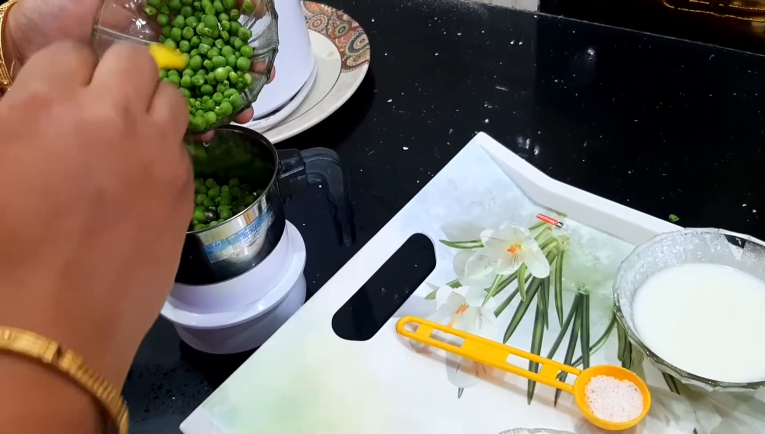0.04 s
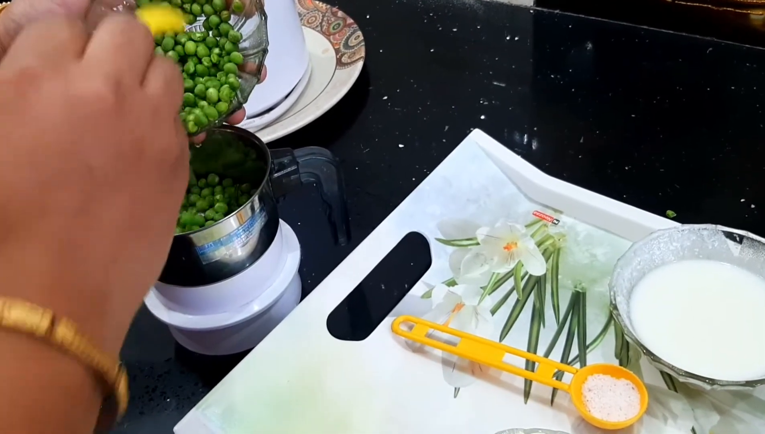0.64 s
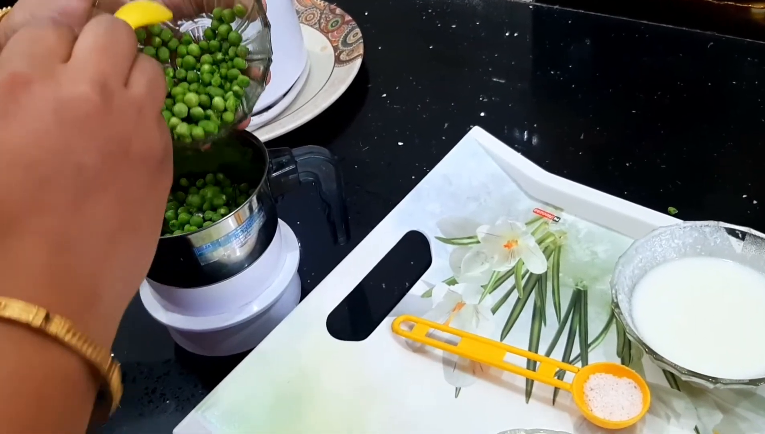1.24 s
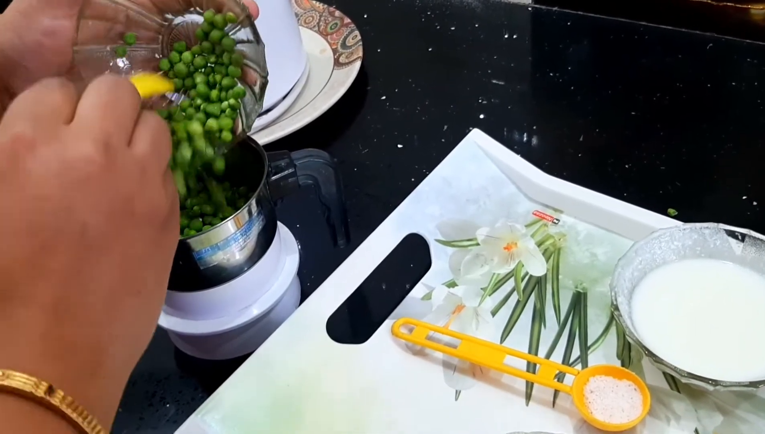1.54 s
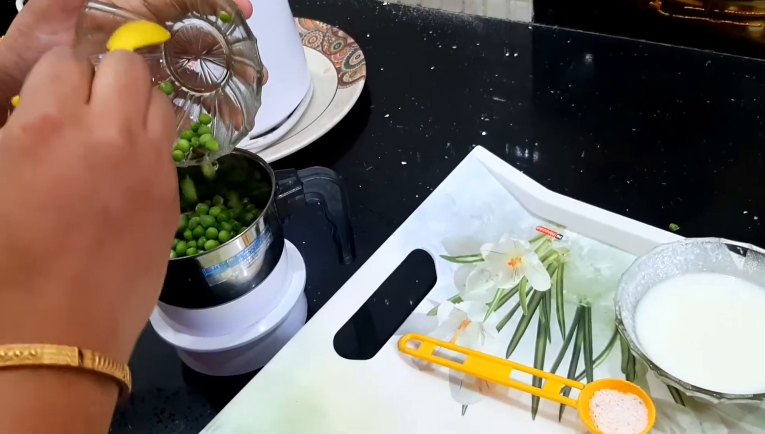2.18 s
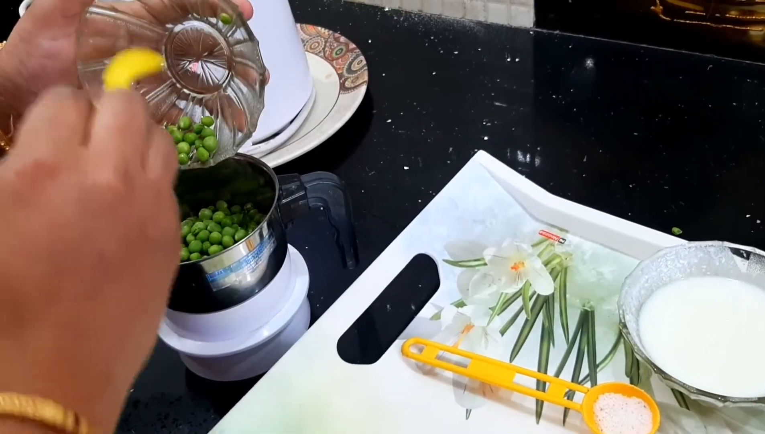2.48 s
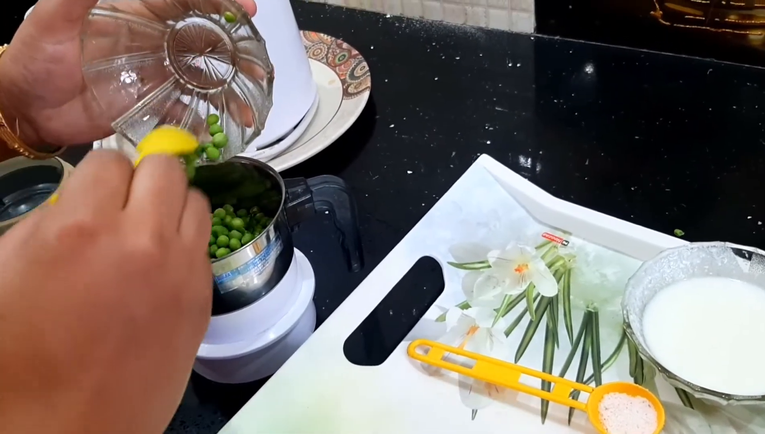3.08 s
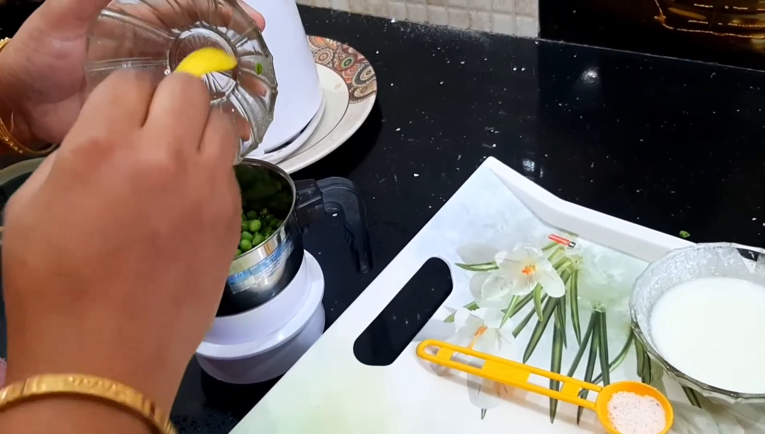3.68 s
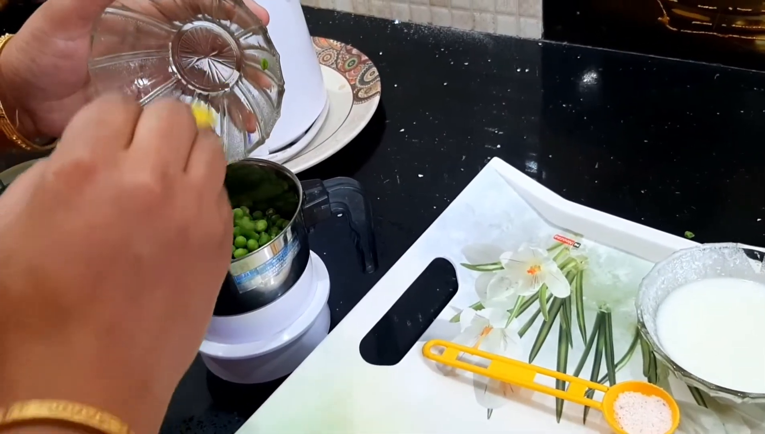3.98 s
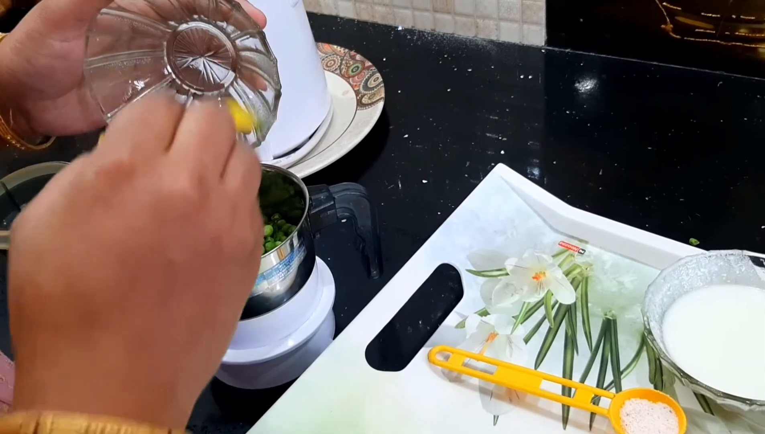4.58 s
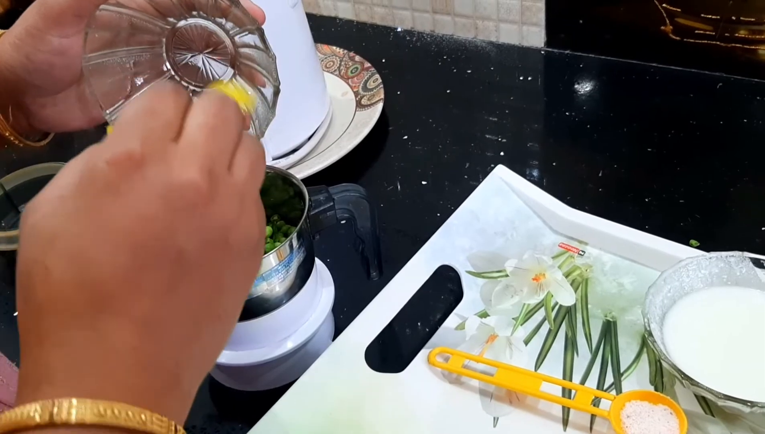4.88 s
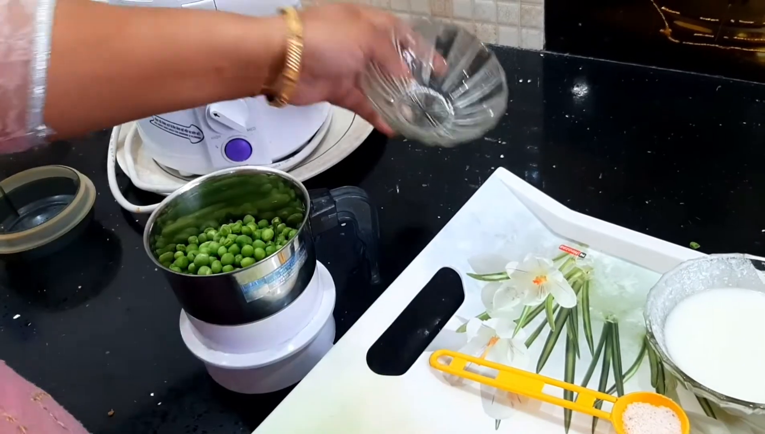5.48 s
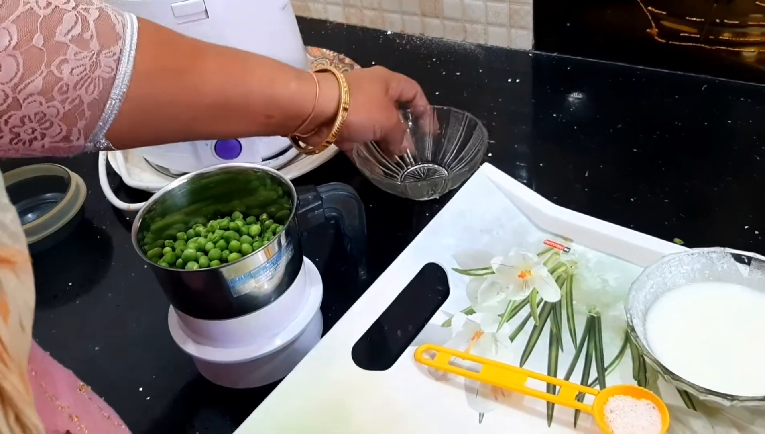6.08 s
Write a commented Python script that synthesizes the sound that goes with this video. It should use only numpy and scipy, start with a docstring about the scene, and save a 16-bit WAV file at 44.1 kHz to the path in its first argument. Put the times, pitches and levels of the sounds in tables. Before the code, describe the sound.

Peas plop softly into a steel jar amid faint spoon ticks, then an empty glass bowl rattles onto stone with a sharp clack.

```python
"""An empty glass bowl is set on a stone counter close to the microphones: it rattles on its foot and rings,
and something hard and light, likely the spoon, clacks down beside it. Before that, the plastic spoon
pushes green peas from the bowl into a steel grinder jar: faint rustles, dull plops and ticks.
A stereo pair hears it all in a tiled kitchen, over a low motor hum."""
import sys
import numpy as np
from scipy import signal
from scipy.fft import rfft, irfft, next_fast_len
from scipy.io import wavfile

SR = 44100
rng = np.random.default_rng(int(sys.argv[2]) if len(sys.argv) > 2 else 0)


def master_out(mix):
    """Clip the mix to full scale and print it as 16-bit PCM to the path in sys.argv[1]."""
    frames = np.transpose(np.atleast_2d(mix))
    ceiling = np.clip(frames, -1, 1)
    pcm = np.round(ceiling * 32767).astype(np.int16)
    wavfile.write(sys.argv[1], SR, pcm)


N = 279594


def undb(db):
    """Decibels to gain."""
    return 10 ** (np.asarray(db) / 20)


def unit(x):
    """Scale to rms 1."""
    return x / np.sqrt(np.mean(x ** 2))


def seconds(length):
    """Time axis of the given length."""
    return np.arange(int(length * SR)) / SR


def curve(rows):
    """Join (seconds, value) points into a value at every sample."""
    return np.interp(np.arange(N) / SR, *np.transpose(rows))


def lookup(points, hz):
    """Read (Hz, value) points on a log-frequency axis."""
    f, value = np.transpose(points)
    return np.interp(np.log(np.maximum(hz, 1)), np.log(f), value)


def walk(rate):
    """Random drift with a spread near 1, turning `rate` times a second."""
    steps = rng.standard_normal(1024)
    return np.interp(np.arange(N) / SR * rate, np.arange(len(steps)), steps)


def add(out, s, sound):
    """Mix a sound in at s seconds."""
    i = max(int(s * SR), 0)
    out[:, i:i + sound.shape[1]] += sound[:, :N - i]


def tilt_db(hz, tilt):
    """Hard contact lifts the treble, soft contact dulls it, by `tilt` dB per octave; the lows stay."""
    return tilt * np.log2(np.maximum(hz / 1650, 1))


def colour(x, points, tilt=0, size=4096):
    """Causal filter with the given (Hz, dB) spectrum, from the cepstrum of its log gain."""
    hz = np.linspace(0, SR / 2, size // 2 + 1)
    cepstrum = irfft(np.log(undb(lookup(points, hz) + tilt_db(hz, tilt))))
    cepstrum[1:size // 2] *= 2
    cepstrum[size // 2 + 1:] = 0
    impulse = irfft(np.exp(rfft(cepstrum)))
    return signal.fftconvolve(x, impulse[None], axes=1)[:, :x.shape[1]]


def stereo_noise(n, alike_hz=750):
    """White noise at two microphones: alike in the bass, unrelated in the treble."""
    size = next_fast_len(n)
    mid, side = rfft(rng.standard_normal((2, size)))
    alike = .88 / (1 + (np.linspace(0, SR / 2, len(mid)) / alike_hz) ** 4)
    mid, side = mid * np.sqrt(1 + alike), side * np.sqrt(1 - alike)
    return unit(irfft(np.array([mid + side, mid - side]), size)[:, :n])


def blows(rows, points, t60, rise_s):
    """Short contacts (seconds, dB, tilt) as noise bursts; softer things take longer to press home."""
    out, t = np.zeros((2, N)), seconds(.1)
    push = np.exp(-np.log(1000) * t / t60) * (1 - np.exp(-(t / rise_s) ** 2))
    for s, db, tilt in rows:
        blow = colour(stereo_noise(len(t)) * push, points, tilt)
        blow /= np.sqrt(np.sum(blow ** 2) / (2 * .004 * SR))  # the energy of 4 ms at rms 1
        add(out, s, undb(db) * blow)
    return out


def ring(strikes, hz, t60):
    """One mode under strikes (seconds, dB): each adds its energy and knocks the phase aside."""
    first_s = min(s for s, _ in strikes)
    t = seconds(max(s for s, _ in strikes) - first_s + .5)
    kicks, out = np.zeros(len(t)), np.zeros((2, N))
    for s, db in strikes:
        kicks[int((s - first_s) * SR)] += undb(db) ** 2
    energy = signal.lfilter([1], [1, -np.exp(-2 * np.log(1000) / (t60 * SR))], kicks + 1e-24)
    sides = rng.choice([-1, 1], size=64)[np.cumsum(kicks > 0)]
    jumps = sides * np.arcsin(np.sqrt(np.minimum(kicks / energy, 1)))
    envelope = np.sqrt(2 * energy) * np.exp(1j * np.cumsum(jumps))
    envelope = signal.lfilter(np.hanning(32) / np.hanning(32).sum(), 1, envelope)
    mic_lag = np.array([[0], [rng.uniform(.9, 1.9)]])  # radians; the right microphone hears it later
    add(out, first_s, np.imag(envelope * np.exp(2j * np.pi * hz * t - 1j * mic_lag)))
    return out


def strokes(rows, swell_db_per_s=139, fade_db_per_s=83):
    """Gain of overlapping strokes (start, length, dB): each swells, holds and fades."""
    t = np.arange(N) / SR
    power = 0
    for s, length, db in rows:
        before, after = np.maximum(s - t, 0), np.maximum(t - s - length, 0)
        power += undb(db - swell_db_per_s * before - fade_db_per_s * after) ** 2
    return np.sqrt(power)


# The kitchen's reverberation. Each row: frequency in Hz, seconds to fall 60 dB.
ROOM_T60 = [(150, 0.98), (1200, 0.56), (5000, 0.29), (14000, 0.25)]

def room(x, wet_db, build_s=0.00067):
    """Add the tiled kitchen's diffuse tail, whose treble dies first."""
    t = seconds(.7)
    noise = rfft(stereo_noise(len(t)))
    octave = np.log2(np.clip(np.linspace(0, SR / 2, noise.shape[1]), 125, 16000) / 125)
    tail = 0
    for k in range(8):
        band = irfft(noise * np.maximum(1 - abs(octave - k), 0), len(t))
        tail += band * np.exp(-np.log(1000) * t / lookup(ROOM_T60, 125 * 2 ** k))
    tail = unit(tail * (1 - np.exp(-t / build_s))) / np.sqrt(len(t))
    return x + undb(wet_db) * signal.fftconvolve(x, tail, axes=1)[:, :N]


# Room tone all around the microphones. Each row: frequency in Hz, relative level in dB.
AIR_COLOUR = [(20, 2), (50, -9), (62, 17), (72, -7.5), (86, 7), (110, 3.5), (200, -10), (500, -10),
              (900, -8), (1300, -11), (4000, -16), (9000, -39), (16000, -30)]
# A motor's hum, the same in both microphones. Each row: frequency in Hz, level in dB.
HUM = [(71.5, -67.5), (141, -86)]

def kitchen(air_db=-67, waver_hz=0.99, waver_db=-0.5):
    """Quiet room air and a motor's low, slightly unsteady hum."""
    air = unit(colour(stereo_noise(N), AIR_COLOUR)) * undb(air_db + 0.23 * walk(4.1))
    hum = 0
    for hz, db in HUM:
        gain = undb(db + waver_db * walk(15))
        hum += gain * np.sin(2 * np.pi * np.cumsum(hz + waver_hz * walk(35)) / SR)
    return air + np.sqrt(2) * hum


def squeak(start_s=4.97, length_s=0.17, hz=1570, bend_hz=250, waver_hz=110, db=-71.5, octave_db=2.5):
    """A faint, broken tone and its octave, perhaps a finger on the glass; pitch and level arch together."""
    arch = np.sin(np.pi * np.clip((np.arange(N) / SR - start_s) / length_s, 0, 1))
    phase = 2 * np.pi * np.cumsum(hz + bend_hz * arch + waver_hz * walk(140)) / SR
    tone = np.sin(phase) + undb(octave_db) * arch * np.sin(2 * phase)
    return undb(db + 4 * walk(60)) * np.sqrt(2 * arch) * tone


# Something rubs faintly near the jar. Each row: start and length in seconds, level in dB.
RUBS = [(1.43, 0.093, -67.5), (2.1, 0.46, -70), (4.92, .25, -72.5)]
# The jar's resonances that the rubbing sets singing. Each row: centre and half-width in Hz, relative level in
# dB.
RUB_MODES = [(4030, 160, -34), (7200, 520, -9)]

def rubbing(patchy_db=2):
    """A faint rubbing makes the steel jar sing in two narrow bands."""
    hz = np.linspace(0, SR / 2, N // 2 + 1)
    resonance = sum(undb(db) / (1 + ((hz - f) / width) ** 2) for f, width, db in RUB_MODES)
    song = unit(irfft(rfft(stereo_noise(N)) * resonance, N))
    return song * strokes(RUBS) * undb(patchy_db * walk(30))


# Soft, low handling noise at the counter. Each row: time in seconds, relative level in dB.
SHUFFLE = [(0.0, -58.5), (0.42, -66.5), (0.61, -63), (1.46, -64.5), (1.56, -66), (1.67, -59.5),
           (1.92, -67.5), (2.07, -59), (2.12, -64), (3.05, -65), (3.27, -70), (4.03, -61), (4.8, -67),
           (4.92, -64), (5.26, -66), (5.49, -63), (5.66, -66), (5.76, -61)]
# Strokes of the hands and of the spoon through the peas. Each row: start and length in seconds,
# hiss level in dB, then low scrape and top-octave sizzle in dB relative to the hiss.
STROKES = [(0.016, 0.1, -64, 0.5, -2), (0.32, 0.072, -70, 4.5, -6.5), (0.488, .02, -69.5, 2, -18),
           (0.566, 0.052, -65, 4, -0.5), (0.801, 0.03, -53, -2, -5), (1.085, 0.053, -55.5, 0.5, -12.5),
           (1.372, 0.019, -54, -2, -6), (1.495, .12, -62.5, -7, -21), (1.69, .035, -68, 8, -17),
           (1.78, 0.15, -66.5, -8, -3), (2.033, 0.021, -63, 6.5, -1.5), (2.216, 0.47, -66.5, -6.5, -0.5),
           (3.034, 0.014, -65, -0.5, -4.5), (3.412, 0.017, -64.5, -5.5, -4.5),
           (3.8, 0.54, -66.5, -2.5, -31), (4.553, 0.036, -66, -5.5, -3.5), (4.88, 0.31, -64.5, -8, -1.5),
           (5.225, 0.39, -62, -3, -5)]
# The rustle's four bands, low to high. Each row: frequency in Hz, relative level in dB.
SHUFFLE_COLOUR = [(60, -15.5), (150, 3), (230, -0.5), (320, 4.5), (410, -3), (500, 4), (650, -4), (900, 4),
                  (1150, -11), (2500, -20.5)]
SCRAPE_COLOUR = [(600, -3), (1300, -1), (1700, 0.5), (2200, 3.5), (2800, 1), (3600, -6), (6000, -13.5)]
HISS_COLOUR = [(1500, -41), (3000, -7), (4100, 0.5), (5000, -0.5), (6300, -0.5), (7200, 2), (7900, -2),
               (11000, -62)]
SIZZLE_COLOUR = [(5000, -67), (8200, 10), (11000, 18.5), (13000, 15.5), (16000, 9.5)]

def rustle(grain_db=1.5, patchy_db=1, shuffle_db=1, soft_top_db=-12, soft_tilt=-8.5):
    """Many tiny slips of peas, spoon and hands merge into a grainy hiss above a low shuffle."""
    scrape = strokes([(s, length, db + low_db) for s, length, db, low_db, _ in STROKES])
    hiss = strokes([row[:3] for row in STROKES])
    sizzle = strokes([(s, length, db + top_db) for s, length, db, _, top_db in STROKES])
    # a stroke with a weak top octave is a soft one, and its hiss is duller too
    soft = np.clip(20 * np.log10(sizzle / hiss) / soft_top_db, 0, 1)
    slips = undb(grain_db * rng.standard_normal(N // 64 + 1).repeat(64)[:N])
    out = unit(colour(stereo_noise(N), SHUFFLE_COLOUR))
    out *= undb(shuffle_db + curve(SHUFFLE) + 2 * walk(25))
    layers = [(SCRAPE_COLOUR, 0, scrape), (HISS_COLOUR, 0, hiss * np.sqrt(1 - soft)),
              (HISS_COLOUR, soft_tilt, hiss * np.sqrt(soft)), (SIZZLE_COLOUR, 0, sizzle)]
    for points, tilt, gain in layers:
        out += unit(colour(stereo_noise(N) * slips, points, tilt)) * gain * undb(patchy_db * walk(45))
    return out


# Clumps of peas drop into the jar. Each row: start and length in seconds, first pea's mean level in dB.
CLUMPS = [(0.007, .096, -40), (0.241, .048, -43.5), (0.536, .072, -44), (0.667, .024, -45.5),
          (0.806, .024, -50), (1.274, .048, -43), (1.59, .024, -46), (1.645, .072, -42),
          (2.011, .072, -44.5), (2.2, .024, -54), (3.178, .048, -47)]
# A plop in the jar's hollow. Each row: frequency in Hz, relative level in dB.
PLOP_COLOUR = [(150, -17), (500, -31.5), (780, -13.5), (880, -10), (950, 3.5), (1020, -6), (1130, -19.5),
               (1600, -26), (4000, -65), (10000, -39)]

def peas(gap_s=.024, step_db=-1, scatter_s=0.00208, scatter_db=2.2):
    """Soft peas thud into the jar one after another, a little unevenly, each clump tailing off."""
    landings = []
    for s, length, db in CLUMPS:
        chance = rng.standard_normal(size=(16, 2))
        count = max(round(length / gap_s), 1)
        for k, (late, loud) in enumerate(chance[:count]):
            landings.append((s + k * gap_s + scatter_s * late, db + k * step_db + scatter_db * loud, 0))
    return room(blows(landings, PLOP_COLOUR, t60=.07, rise_s=.0015), wet_db=-7)


# Peas hit the jar's bare wall. Each row: start in seconds, relative level in dB.
WALL_HITS = [(1.675, -43.5), (1.695, -42.5), (2.03, -46), (2.055, -50)]
# The steel wall's modes. Each row: frequency in Hz, relative level in dB, seconds to fall 60 dB.
WALL_MODES = [(1210, -6, .1), (2100, -1, .12), (2160, -6, .1), (2380, -6, .08), (2760, -2, .06),
              (4050, -11, .08)]

def jar_wall(gain_db=-7):
    """A few clumps strike bare steel and make it ring briefly."""
    steel = sum(undb(db + gain_db) * ring(WALL_HITS, hz, t60) for hz, db, t60 in WALL_MODES)
    return room(steel, wet_db=-3.5)


# The spoon ticks on the glass and clinks on the jar's rim. CLACKS first holds the duller body of the chink at
# 5.97 s, then loud clacks on the counter, likely the spoon. # Each row: start in seconds, level in dB, treble
# tilt in dB per octave.
TICKS = [(0.578, -46, 10), (0.650, -51.5, -0.5), (1.6702, -32.5, 4), (1.8352, -50.5, -3), (1.9415, -53, -3),
         (2.0308, -50, -3), (2.1480, -33, 2.5), (2.2343, -46, 9), (2.5596, -44.5, 1), (2.9706, -42, 0.5),
         (3.3643, -37, 4.5), (3.7155, -46.5, 1), (4.1325, -44.5, 0), (4.2557, -47, 0), (4.5057, -36, 4),
         (4.9013, -52, 1)]
CLINKS = [(1.3152, -38, -4.5)]
CLACKS = [(5.9715, -20, -10), (6.2122, -19.5, 2.5), (6.2142, -8.5, 1.3), (6.2262, -24, -7.5),
          (6.2452, -26, -17.5), (6.2475, -21.5, -2)]
# Their spectra at the microphones. Each row: frequency in Hz, relative level in dB.
TICK_COLOUR = [(300, -52), (1700, -12), (2400, -4), (6000, -0.5), (10000, -8), (16000, -3)]
CLINK_COLOUR = [(1000, -27.5), (4500, -17.5), (5400, -0.5), (6300, -14), (7500, -13.5), (16000, -15)]
CLACK_COLOUR = [(80, -36), (290, -18.5), (550, -20), (1350, -6), (2100, -14.5), (2700, 1.5), (3300, -8.5),
                (4100, 7), (5000, -7.5), (7000, 2), (8100, -2.5), (9300, -13), (12000, -12), (16000, -30)]

def spoon():
    """Hard, quickly damped contacts: light ticks, one small clink, then loud clacks close by."""
    ticks = blows(TICKS, TICK_COLOUR, t60=.015, rise_s=.0008)
    clink = blows(CLINKS, CLINK_COLOUR, t60=0.02, rise_s=0.00065)
    clacks = blows(CLACKS, CLACK_COLOUR, t60=.018, rise_s=.0009)
    return room(ticks + clink, wet_db=-4) + room(clacks, wet_db=-3)


# A chink as the bowl settles. Each row: start in seconds, level in dB, treble tilt in dB per octave.
CHINKS = [(5.9705, -15.5, -2), (5.9728, -17, 0.7)]
# Its spectrum. Each row: frequency in Hz, relative level in dB.
CHINK_COLOUR = [(500, -23), (2500, 2.5), (5500, -1.5), (9000, -16.5), (12000, -1), (14500, 0), (16000, -2)]

def chink():
    """A thin, very bright double touch, perhaps of bangles; the first row of CLACKS gives it a duller body."""
    return room(blows(CHINKS, CHINK_COLOUR, t60=0.014, rise_s=0.00056), wet_db=-8)


def rocking(lands_s=5.8164, first_gap_s=.0486, power=.608, count=10):
    """The bowl rocks on its foot, ever faster, weaker and duller; rows are laid out as in BUMPS."""
    rows = []
    for k in range(count):
        s = lands_s + first_gap_s * k ** power
        knock_db, ring_db = -12 - 1.33 * k, -22.5 - 0.67 * k
        tilt, place = -2 - 0.45 * k, 0.66 - 0.042 * k
        rows.append((s, knock_db, tilt, ring_db, place))
    return rows


# The bowl is pushed upright, close to the microphones. Each row: start in seconds, knock level in dB,
# treble tilt in dB per octave, relative ring level in dB, place struck from 0 (foot) to 1 (wall).
BUMPS = [(6.001, -28, -4, -25.5, 0.25), (6.026, -38, -11.5, -17.5, 0.15), (6.0783, -11, 9.5, -21, 0.91),
         (6.1044, -19.5, 10, -23, 0.52), (6.118, -23, -12, -20, 0.058), (6.133, -30, -19, -39, 0.48),
         (6.155, -46, -5, -23.5, 0.57)]
# The glass bowl's modes. Each entry: frequency in Hz.
BOWL_HZ = [731, 810, 1208, 1368, 1493, 1513, 1657.5, 1909, 2099, 2389, 2575, 3536, 3575.5, 6022, 12885,
           13640, 14730, 15080]
# The same modes in order. Each row: relative level in dB struck on the foot, then on the wall,
# seconds to fall 60 dB, left microphone minus right in dB.
BOWL_MODES = [(-11.5, -32, 0.032, 1), (-39, -35.5, 0.056, -9), (-18, -30, 0.092, -3), (-31, -17, 0.29, -10),
              (-25, -10.5, .18, 5), (-28, -22, 0.072, 0), (1.5, -9, 0.36, -2.5), (-24, -20, 0.26, -1),
              (-12.5, -18, 0.15, 0), (-12, -20, 0.14, 3), (-18, -16, 0.08, 9), (-22, -0.5, 0.27, 7),
              (-7, 3.5, 0.31, 2), (-14.5, -10.5, 0.11, 1.5), (-21, -10, 0.31, -4.5),
              (-39, -6.5, 0.14, 18.5), (-23, -16, 0.083, -4), (-31, -34, 0.092, 4)]
# Glass knocking on stone. Each row: frequency in Hz, relative level in dB.
KNOCK_COLOUR = [(50, -38), (115, -29.5), (200, -18), (260, -24), (420, -13), (620, -20), (760, -8.5),
                (1100, -9), (1530, 5.5), (2200, -4), (2600, 1), (3500, -12.5), (4600, -24), (10000, -50),
                (15000, -68)]
# The counter's thud. Each row: frequency in Hz, level in dB relative to the knock, seconds to fall 60 dB.
COUNTER_MODES = [(114, -37.5, 0.48), (303.6, -39, 0.52)]
# Fingers still the bowl's ring. Each row: time in seconds, gain in dB.
GRIP = [(6.185, 0), (6.205, -8), (6.235, -24)]

def bowl(rebound_s=0.0087, rebound_db=-9.5, sway_db=-0.4):
    """The bowl rocks and bumps on the stone; these knocks ring the glass and thud in the counter."""
    rocks = rocking()
    contacts = rocks + BUMPS
    rebounds = [(s + rebound_s, db + rebound_db, tilt) for s, db, tilt, _, _ in rocks]
    knocks = blows([row[:3] for row in contacts] + rebounds, KNOCK_COLOUR, t60=.015, rise_s=.001)
    glass = 0
    for hz, (foot_db, wall_db, t60, pan_db) in zip(BOWL_HZ, BOWL_MODES):
        # the place struck decides which modes sound; a soft contact hardly reaches the high ones
        strikes = [(s, db + foot_db + place * (wall_db - foot_db) + tilt_db(hz, min(tilt, 0)))
                   for s, _, tilt, db, place in contacts]
        # as the bowl rocks, each mode's lobes swing past the microphones
        aim_db = np.array([[pan_db], [-pan_db]]) / 2 + sway_db * walk(45)
        glass += undb(aim_db) * ring(strikes, hz, t60)
    counter_hits = [row[:2] for row in contacts]
    thud = sum(undb(db) * ring(counter_hits, hz, t60)[0] for hz, db, t60 in COUNTER_MODES)
    return room(knocks, wet_db=-3) + room(glass * undb(curve(GRIP)), wet_db=-10) + thud


def scene():
    """The work at the counter and the kitchen around it, as they reach the stereo pair."""
    return peas() + jar_wall() + rustle() + rubbing() + squeak() + spoon() + bowl() + chink() + kitchen()


def record(dry, low_cut_hz=48, top_hz=15800):
    """The microphones drop the deepest bass; the recorder clips at full scale and cuts the top."""
    low_cut = signal.butter(2, low_cut_hz, "high", fs=SR, output="sos")
    top_cut = signal.ellip(8, .2, 70, top_hz, fs=SR, output="sos")
    return signal.sosfilt(top_cut, np.clip(signal.sosfilt(low_cut, dry), -1, 1))


dry = scene()
out = record(dry)
master_out(out)
```